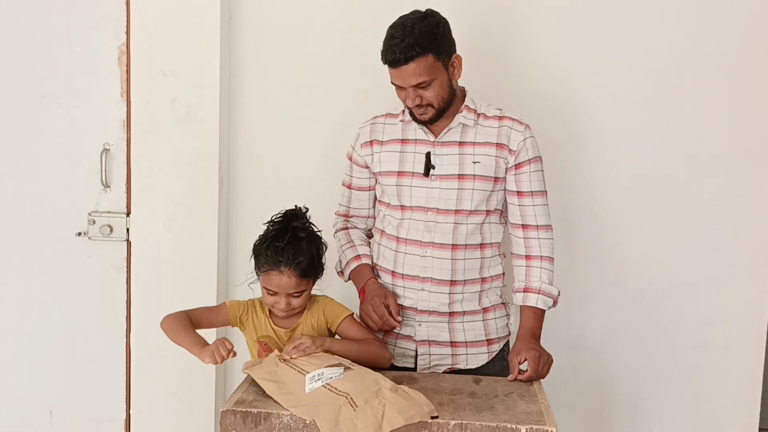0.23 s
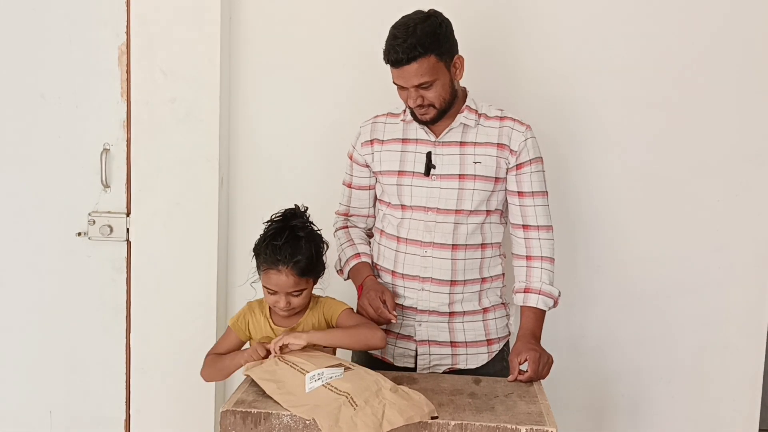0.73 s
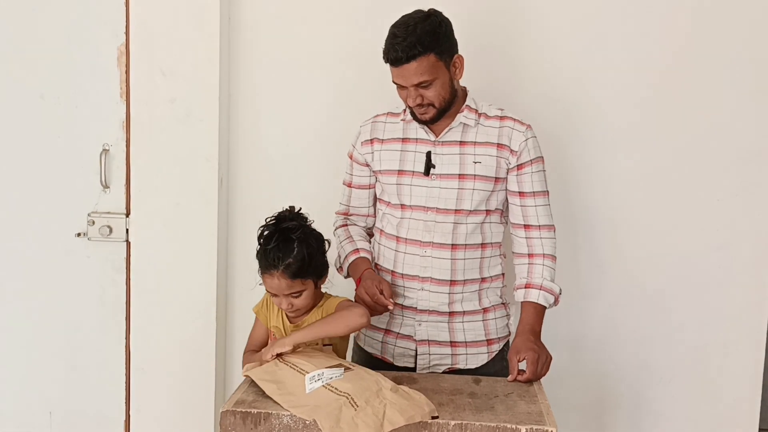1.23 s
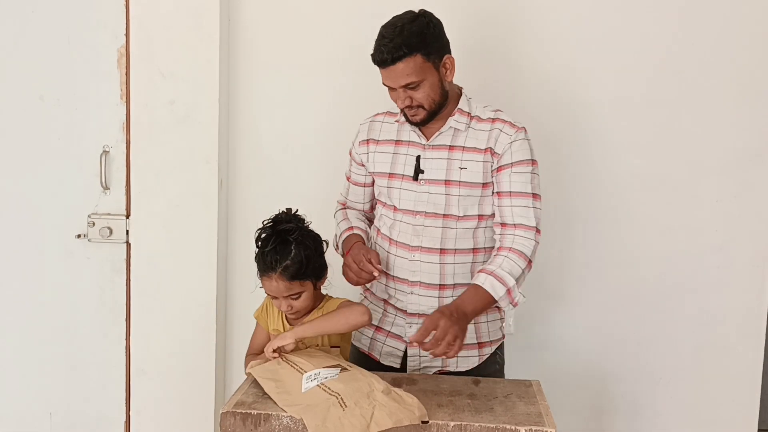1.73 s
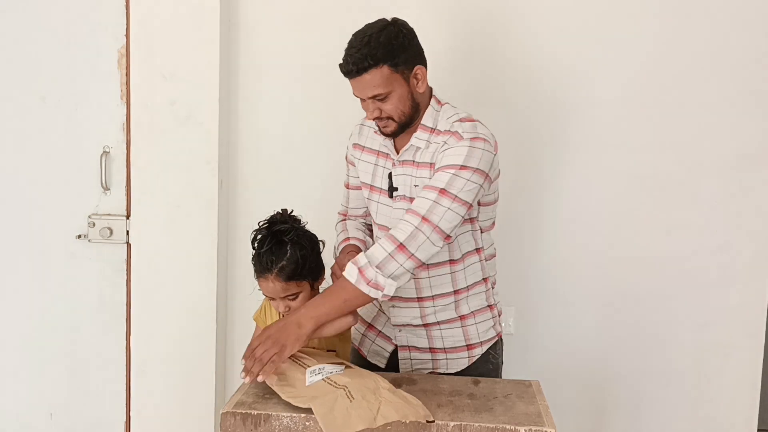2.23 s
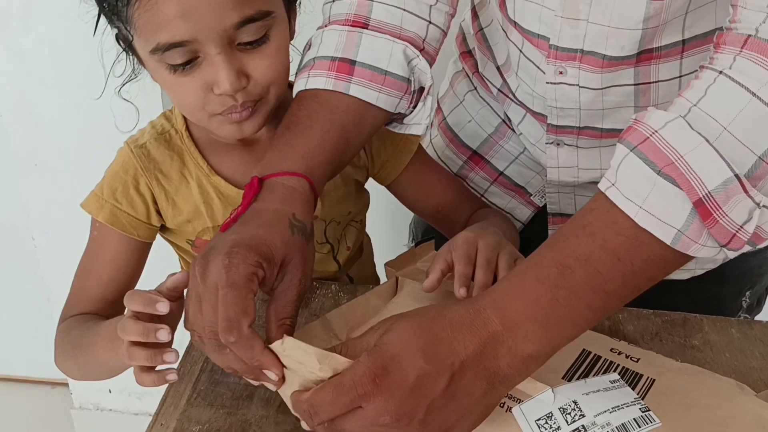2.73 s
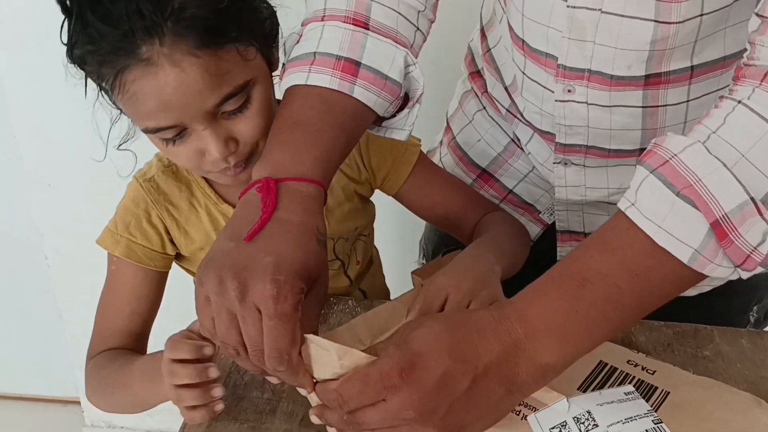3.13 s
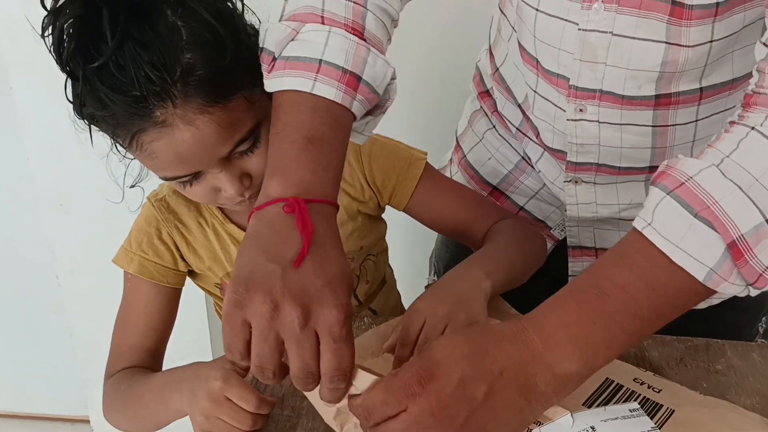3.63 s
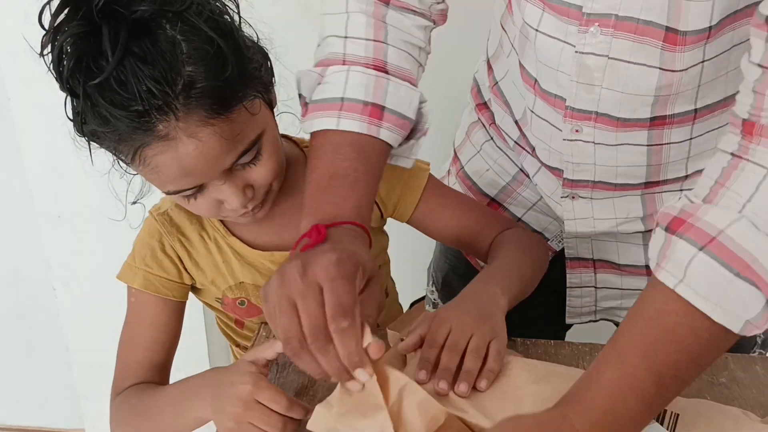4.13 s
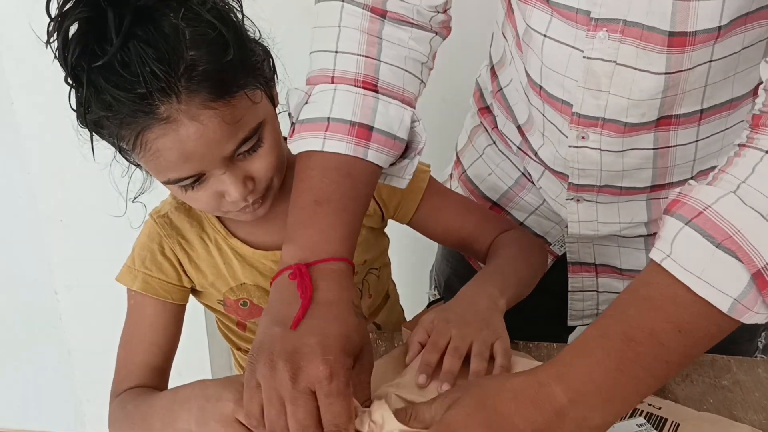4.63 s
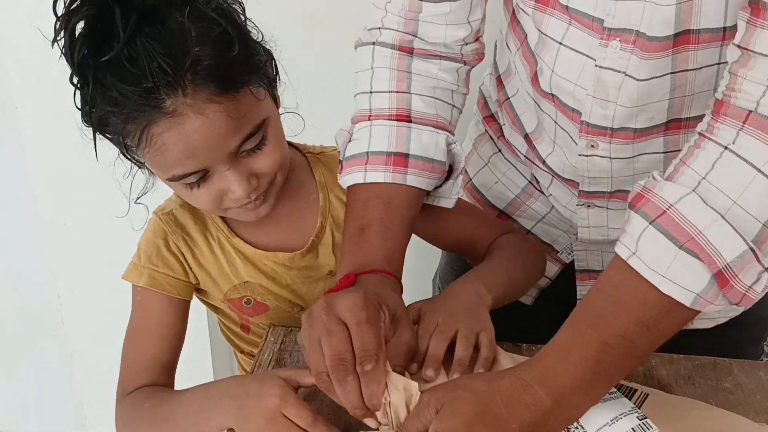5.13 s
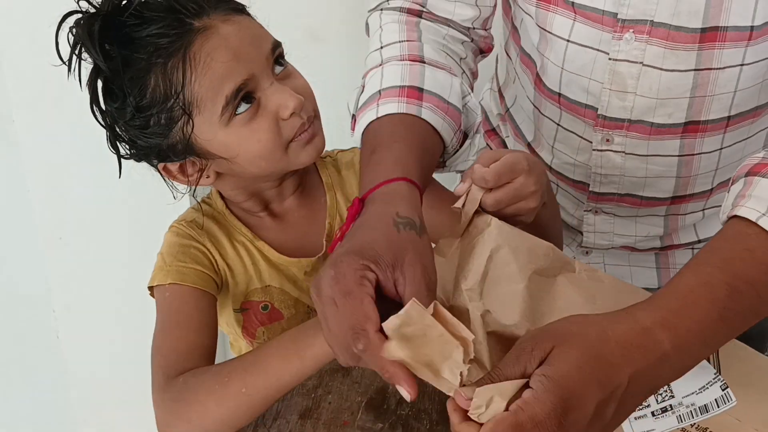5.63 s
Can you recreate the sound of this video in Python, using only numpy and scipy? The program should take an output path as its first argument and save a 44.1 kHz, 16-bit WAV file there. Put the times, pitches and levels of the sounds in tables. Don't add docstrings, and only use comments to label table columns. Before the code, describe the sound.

A stiff paper mailer is opened by hand at a wooden table in a small, lightly echoing room, heard through a close lapel microphone over very faint hush. From 0 to 0.45 s, fingers make scattered crisp crackles and hollow pops; then it is nearly quiet, with tiny ticks around 1.1 s. Sharper creases come at 1.4-1.75 s. Around 2.0-2.3 s a palm slides softly over paper while cloth shudders low against the microphone, ending in a sharp snap near 2.3 s and another just before the 2.6 s cut. A faint knuckle tap follows at 2.7 s. Snaps thicken at 2.85-3.2 s, ease, then return at 3.55 s. From 3.9 to 5.2 s tearing and crumpling are dense and loud, strongest near 4.2 s and around 4.8-5.1 s. At 5.24 s it abruptly drops to sparse faint folds, then snappy creases and a cloth bump at 5.75-5.9 s.

```python
import sys
import numpy as np
from scipy import signal
from scipy.fft import rfft, irfft
from scipy.io import wavfile
from scipy.ndimage import uniform_filter1d, minimum_filter1d

SR = 44100
rng = np.random.default_rng(int(sys.argv[2]) if len(sys.argv) > 2 else 0)


def natural_amplitude(level_db):
    exponent = np.asarray(level_db, float) / 20
    return 10 ** exponent


def file_out(sig):
    cols = np.atleast_2d(sig).T
    lim = np.clip(cols, -1, 1)
    pcm = np.round(lim * 32767).astype(np.int16)
    wavfile.write(sys.argv[1], SR, pcm)


N = 259749

# (frequency [Hz], level per hertz [dB])
BUCKLE_SPECTRUM = [(120, -51), (200, -33.5), (297, -7.5), (489, -15.5), (588, 0), (1390, -3), (3200, -10.5),
                   (4160, -43), (7040, -120)]
FIBRE_SPECTRUM = [(1530, -4), (2600, -6), (2820, -5.5), (4200, -6), (6390, -8.5), (7540, -11), (8310, -14),
                  (9950, -20.5), (11700, -29.5), (15600, -53.5)]
RUMBLE_SPECTRUM = [(22, -4.5), (40, -1.5), (54, -4), (70, -12.5), (110, -15), (200, -21.5)]
# (frequency [Hz], level per hertz [dB])
HUSH_SPECTRUM = [(90, -10.5), (200, -11), (790, -18.5), (4000, -28.5), (10000, -34.5), (12500, -56)]
# (frequency [Hz], width [Hz], level [dB])
SLIDE_BANDS = [(727, 470, 0.5), (1170, 120, 1.5), (1830, 224, 12.5), (2343, 130, 9), (3300, 790, -9),
               (4600, 480, -7.5), (6750, 540, -14), (9330, 2400, -19.5)]

# (frequency [Hz], level [dB], 60 dB decay time [s])
TABLE_MODES = [(98.4, -7.5, 0.14), (283.4, -1.5, 0.2), (301.6, -0.5, 0.09), (408, 7.5, 0.026),
               (542.3, -2.5, 0.22), (569, -0.5, 0.16)]
# (time [s], level [dB])
KNOCKS = [
    (2.6854, -18.5),
    (2.716, -19.5),
]

# (frequency [Hz], 60 dB decay time [s])
ROOM_DECAY = [(200, 0.62), (530, 0.44), (1400, 0.3), (3700, 0.38), (9700, 0.14)]
# (start [s], end [s])
SHOTS = [
    (0, 2.5872),
    (2.601, 5.2405),
    (5.243, 6),
]
# (frequency [Hz], width [Hz], gain [dB])
SHADES = [
    [(444, 160, 6), (5680, 1000, -3.5), (9060, 640, 4.5)],
    [(990, 310, -2), (2893, 550, -5), (8200, 600, -5)],
    [(1240, 870, -6.5), (1780, 330, 2), (2840, 1500, -7), (9670, 7200, -8.5)],
]
ROOM_DB = [1.5, -1.5, -2.5]
# (start [s], end [s], frequency [Hz], width [Hz], gain [dB])
COVERS = [(0.41, 0.55, 3000, 700, 6.5), (1.06, 1.42, 1030, 330, -10.5), (1.2, 1.43, 4800, 1300, -9),
          (1.17, 1.35, 2500, 2600, 4.5), (2, 2.1, 5400, 900, -10), (2.57, 2.96, 2630, 860, -7.5),
          (3.39, 3.57, 2880, 570, -20), (3.67, 3.86, 10000, 5000, -22), (1.6, 1.6, 350, 260, 5),
          (3.9, 4.1, 410, 210, 9.5), (2.77, 2.87, 6000, 1800, 5.5), (5.16, 5.25, 7400, 4000, -5),
          (4.44, 4.64, 800, 600, -6.5), (5.25, 5.5, 6200, 4300, 3)]
# (start [s], end [s])
DULL_SPELLS = [(3.575, 3.632), (3.7, 3.9), (4.06, 4.125), (4.345, 4.398), (4.64, 4.776), (5.135, 5.24),
               (5.76, 5.9)]

# (peak time [s], swell [ms], fade [ms], crackle level [dB], fizz above crackle [dB])
FINGERS = [(0.0, 11, 102, -37.5, 1.5), (0.14, 7.8, 89, -52.5, 16), (0.224, 5.1, 181, -18.5, 0),
           (0.6, 110, 320, -59.5, 1.5), (0.68, 4.9, 82, -42, -0.5), (1.025, 3.4, 360, -71.5, 14),
           (1.1, 24, 310, -45, -3), (1.25, 240, 230, -58.5, -21), (1.468, 110, 170, -36, -5),
           (1.548, 45, 162, -26, 3), (2.293, 2.8, 174, -21.5, -15), (2.5, 470, 330, -53, -10)]
# (peak time [s], swell [ms], fade [ms], crackle level [dB], fizz above crackle [dB])
HANDS = [(2.66, 210, 430, -47, 9.5), (2.781, 47, 520, -52.5, 15.5), (2.979, 10, 213, -30, 1),
         (3.12, 290, 110, -27, 2.5), (3.412, 10, 2100, -52.5, 11.5), (3.616, 164, 29, -28, 0),
         (3.901, 18, 1060, -24.5, -6.5), (4.09, 200, 120, -26, -5.5), (4.135, 4.5, 116, -10.5, 1),
         (4.19, 46, 90, -13, 1), (4.321, 180, 390, -23, -4.5), (4.401, 22, 25, -18.5, 8),
         (4.53, 30, 100, -34.5, 8), (4.664, 70, 1600, -29.5, -1), (4.891, 10, 840, -23.5, -3),
         (5.1, 800, 2300, -27, -31), (5.369, 770, 280, -50.5, -8), (5.564, 140, 67, -44, -7.5),
         (5.661, 260, 420, -55, -1), (5.78, 92, 3300, -29, -26)]
# (peak time [s], swell [ms], fade [ms], level [dB])
BRUSHES = [(0.33, 1900, 460, -47.5), (1.76, 1100, 570, -48), (2.05, 45, 460, -35.5), (2.18, 47, 110, -35),
           (2.74, 730, 380, -43), (3.22, 500, 620, -45.5), (4.2, 260, 1400, -44), (5.2, 1300, 640, -46),
           (5.89, 91, 100, -31)]
# (peak time [s], swell [ms], fade [ms], level [dB])
SLEEVE = [
    (5.246, 2, 310, -54.5),
]
# (peak time [s], swell [ms], fade [ms], level [dB])
SLIDES = [(2.04, 69, 230, -32), (2.095, 104, 56, -30.5), (2.165, 36, 180, -35), (2.215, 120, 120, -32)]
# (peak time [s], swell [ms], fade [ms], level [dB], pitch [Hz])
HUMS = [(0.06, 900, 350, -45.5, 892), (0.63, 150, 170, -59.5, 2650), (2.68, 140, 160, -36.5, 1834),
        (2.8, 260, 300, -44, 1587), (0.7, 28, 130, -52.5, 1474), (3.571, 260, 51, -37, 583),
        (3.849, 60, 82, -39.5, 2490), (5.386, 63, 82, -48, 1946), (5.57, 120, 70, -49, 776),
        (5.569, 70, 73, -48, 1467), (5.79, 72, 580, -34.5, 1820)]

# (peak time [s], panel level [dB], panel pitch [Hz], crack above panel [dB], crack pitch [Hz])
PICKS = [(0.0575, -29.5, 2200, 10, 3820), (0.0672, -35, 970, 10, 3900), (0.1382, -25, 1950, -10, 3100),
         (0.1426, -22, 1690, -2, 3570), (0.1509, -32, 2690, 5, 4320), (0.2277, -11, 1900, -3, 3150),
         (0.2324, -34, 1600, -19, 4630), (0.2699, -19, 1390, 2, 6200), (0.3124, -7.5, 802, -8, 3650),
         (0.376, -21, 940, -4, 7050), (0.4247, -35.5, 630, 16.5, 7300), (0.5625, -44.5, 1250, 0.5, 6880),
         (0.6817, -45.5, 2050, -6, 4890), (0.7102, -35, 2065, -5.5, 3700), (1.0223, -49, 2590, 14.5, 5300),
         (1.0724, -42, 2260, 5, 3410), (1.0992, -36, 2050, 9.5, 5530), (1.1369, -33.5, 680, 5, 3640),
         (1.2264, -29.5, 2460, -3, 3760)]
PULLS = [(1.3049, -40.5, 2255, 3, 6300), (1.372, -50, 2520, 4.5, 6500), (1.3965, -35.5, 2330, 0.5, 7200),
         (1.4212, -26.5, 1450, -3.5, 3430), (1.4683, -18.5, 2430, -5, 3980), (1.5184, -23.5, 2100, 3, 3500),
         (1.541, -17.5, 1980, -6, 3233), (1.549, -20.5, 1305, 6.5, 3300), (1.5663, -14, 2170, -5, 3680),
         (1.6462, -17, 1480, 8.5, 7020), (1.7246, -27, 2170, 2.5, 3420), (2.2858, -32.5, 555, 2.5, 4430),
         (2.2957, -8.5, 950, 2, 4700), (2.3001, -10.5, 1196, 2, 4900), (2.4014, -20.5, 1220, -12, 4300),
         (2.5727, -3.5, 1493, -8.5, 6830), (2.579, -34, 1940, 7, 4480), (2.5841, -8, 1640, -6.5, 4600)]
PRIES = [(2.6455, -23.5, 1780, 2, 4550), (2.772, -31, 683, 8.5, 4500), (2.8356, -15.5, 1650, -1, 4600),
         (2.8639, -22.5, 1560, 1, 4330), (2.8769, -23, 1400, 10.5, 4830), (2.8844, -6, 1570, 0, 5070),
         (2.9243, -10.5, 1540, -12, 4830), (2.9416, -14.5, 1120, -7, 4830), (2.959, -19.5, 1510, 0, 5070),
         (2.9839, -7.5, 1730, 1, 4700), (2.9883, -9, 1420, -7, 6100), (3.0182, -27, 630.5, 11.5, 3960),
         (3.0413, -23.5, 1540, 8, 4200), (3.0591, -18, 1140, 12, 5100), (3.0717, -9, 1210, -23, 4440),
         (3.0823, -2.5, 1160, -14, 4400), (3.0998, -7, 1510, -4, 5060), (3.114, -18.5, 1290, 11.5, 5550),
         (3.128, -14.5, 1500, 2.5, 3640), (3.1441, -2, 1570, -11, 4120), (3.1569, -6, 1980, -12, 3200),
         (3.161, -3, 2010, -7, 4170), (3.2165, -16.5, 1100, -16, 4680), (3.221, -24.5, 1200, 7, 4600)]
LIFTS = [(3.3998, -41, 1140, 9, 4100), (3.4094, -40.5, 2270, 19, 3900), (3.5148, -23.5, 1650, 6, 4240),
         (3.5629, -29.5, 553, 16.5, 4400), (3.5684, -25, 600, 10.5, 4600), (3.5736, -16.5, 1430, -14, 3650),
         (3.579, -23.5, 1230, 8.5, 4070), (3.5907, -20.5, 1390, 6, 4490), (3.595, -14, 1380, -3, 4200),
         (3.62, -10, 1160, -14, 4030), (3.6361, -9, 1660, -8, 4440), (3.6404, -12, 2180, 7.5, 3940),
         (3.6438, -12.5, 1050, 1, 3970), (3.702, -25.5, 2410, 16.5, 4350), (3.7348, -27, 1570, -3.5, 3870),
         (3.7912, -33.5, 1430, -4, 3960), (3.8087, -28, 2420, 6.5, 4300), (3.814, -28.5, 1570, -1, 4070),
         (3.8407, -23.5, 2480, 9, 4450), (3.8505, -23.5, 2420, 4.5, 4340)]
TEAR = [(3.887, -27.5, 2380, 21, 6350), (3.9022, -17.5, 2300, 15.5, 4900), (3.908, -7, 1420, 4, 4320),
        (3.9385, -6.5, 1680, -6, 4000), (3.9648, -9, 1660, -4, 4290), (3.9976, -2.5, 2220, -0.5, 4500),
        (4.0092, -0.5, 1600, -10, 4600), (4.019, -2, 1510, -11.5, 4200), (4.0247, -11, 1420, 0.5, 6001),
        (4.0756, -11.5, 1230, -5.5, 4800), (4.1111, -5.5, 1260, 0.5, 4730), (4.1361, -6, 1350, -5, 3900),
        (4.1588, -3.5, 1340, -11.5, 4100), (4.1828, 3.5, 1750, -10.5, 3720), (4.1882, 2.5, 1400, 2.5, 4310),
        (4.1967, -13.5, 1860, -6.5, 4100), (4.213, -7, 1670, 4.5, 6400), (4.228, -9.5, 1300, -17.5, 4530),
        (4.243, -16.5, 1670, -2.5, 3049), (4.2744, -18, 1770, 4.5, 3320), (4.2907, -18, 1300, 6.5, 3300)]
BUNCH = [(4.312, -17, 840, -9, 4160), (4.3175, -11, 1650, -6, 3450), (4.344, -11, 1640, -17, 3650),
         (4.3988, -15, 1400, -3.5, 4170), (4.4064, -6, 1170, 5.5, 4750), (4.439, -10, 2020, -5, 3900),
         (4.5165, -15.5, 2140, -3, 3000), (4.5315, -18, 1170, 3.5, 3240), (4.5384, -17, 2280, -7.5, 3430),
         (4.548, -18, 1760, 3.5, 4220), (4.5597, -31, 2074, -7, 3750), (4.6467, -17, 1640, 0, 4800),
         (4.6556, -13.5, 1670, -1.5, 4700), (4.6804, -11.5, 1650, -6, 3830),
         (4.6907, -11.5, 1720, 3.5, 5160), (4.736, -14.5, 1480, -2, 5120), (4.739, -16, 1410, 5, 6440),
         (4.747, -19, 1110, 14.5, 6670), (4.7579, -6, 1830, 2, 7340), (4.763, -9.5, 1530, -5, 6750),
         (4.767, -2.5, 1060, -9, 4900), (4.774, -7.5, 915, -13, 3930), (4.7786, -7.5, 1390, -0.5, 4900)]
CRUMPLE = [(4.798, -13, 1700, 6, 4100), (4.8009, -4, 1830, -14, 5150), (4.8053, -1, 1600, -21, 3930),
           (4.8126, -7.5, 1740, -20, 4470), (4.8359, -16, 1640, 2.5, 3670), (4.8646, -16, 1620, 8, 3430),
           (4.891, -2, 1720, -12, 3550), (4.9158, -12.5, 1080, 2, 3820), (4.9435, -10.5, 2550, 1.5, 3450),
           (4.9634, -12.5, 1420, 4.5, 3460), (5.0, -8.5, 610, 1.5, 4220), (5.0062, -2.5, 1700, -4.5, 3350),
           (5.0342, -1, 1720, -25, 4950), (5.04, -7.5, 640, 1, 4910), (5.0816, 0, 1640, -8, 3830),
           (5.086, -1, 1380, -9.5, 4150), (5.0905, -5, 848, -16, 4000), (5.102, -13, 1330, 1.5, 3040),
           (5.107, -10.5, 615, -32, 4400), (5.1214, -6.5, 1350, -2.5, 4330),
           (5.1314, -6.5, 1900, -17, 3080), (5.1567, -13, 1800, -3.5, 4290), (5.1675, -17.5, 1000, 3, 3200),
           (5.2022, -10.5, 2050, -12, 3510)]
FOLDS = [(5.303, -39, 1374, -10, 7700), (5.3532, -31.5, 1910, -13, 3460), (5.3727, -25, 1900, -22.5, 3110),
         (5.443, -36, 1830, -10, 3200), (5.5312, -37, 730, 2, 3270), (5.6423, -40, 1600, -8, 3970),
         (5.6777, -49, 910, 1, 3630), (5.7135, -30, 1720, -10.5, 4200), (5.7487, -23.5, 1730, -30, 3120),
         (5.7679, -21.5, 850, -3.5, 4500), (5.7795, -11, 786, -9, 4570), (5.8199, -8.5, 2180, -15, 4700),
         (5.8311, -3.5, 892, -16.5, 3640), (5.8399, -7.5, 1105, -21, 4750), (5.8497, -11.5, 910, -7, 4700),
         (5.872, -12, 907, -11, 4590), (5.8822, -7, 2310, -17, 3100)]
LATE_CREASES = [(4.9533, -22, 2190, 6.5, 5150), (4.984, -16, 1780, 3, 7770), (5.5481, -30, 1440, -15, 3300)]


def evened(x):
    return x / np.sqrt(np.mean(x ** 2) + 1e-20)


def read(points, hz):
    f, value = np.transpose(points)
    return np.interp(np.log(hz + 1), np.log(f + 1), value, value[0] - 40, value[-1] - 40)


def curve(rows):
    s, *columns = np.transpose(rows)
    return [np.interp(np.arange(N) / SR, s, c) for c in columns]


def coloured(x, points):
    log_gain = np.log(natural_amplitude(read(points, np.abs(np.fft.fftfreq(4096, 1 / SR)))))
    response = np.exp(np.conj(signal.hilbert(log_gain)))
    taps = np.fft.ifft(response).real[:2048]
    return signal.oaconvolve(x, taps / np.linalg.norm(taps))[:len(x)]


def add(mix, s, sound):
    part = mix[round(s * SR):][:len(sound)]
    part += sound[:len(part)]


def ring(hz, cycles, size=900):
    turns = np.arange(size) / SR * hz
    envelope = (1 - np.exp(-turns / 0.5)) ** 2 * np.exp(-turns / cycles)
    return envelope / envelope.max() * np.sin(2 * np.pi * turns)


def clicks(per_s, spread_db, clump):
    size = natural_amplitude(spread_db * np.minimum(rng.exponential(1, N), 4)) * rng.choice([-1., 1.], N)
    return size * (rng.random(N) < per_s * clump / SR)


def effort(moves, rest_db=-120, column=False):
    t = np.arange(0, N / SR + .001, .0005)
    power = natural_amplitude(rest_db) ** 2
    for s, swell_ms, fade_ms, db, *above in moves:
        start, end = next(piece for piece in SHOTS if s < piece[1])
        rise = np.maximum(s - t, 0) * 1000 / swell_ms
        fall = np.maximum(t - s, 0) * 1000 / fade_ms
        drop_db = 30 * (rise ** 0.68 + fall ** 0.88)
        inside = (t >= start) * (t < end)
        power = power + inside * natural_amplitude(db + column * sum(above) - drop_db) ** 2
    return np.interp(np.arange(N) / SR, t, np.sqrt(power))


def creases():
    return np.transpose(sorted(PICKS + PULLS + PRIES + LIFTS + TEAR + BUNCH + CRUMPLE + FOLDS + LATE_CREASES))


def shower(db, before_s, after_s):
    marks = np.zeros(N)
    marks[np.round(creases()[0] * SR).astype(int)] = natural_amplitude(db) ** 2
    t = np.arange(-3000, 3001) / SR
    spread = np.exp(np.minimum(t / before_s, -t / after_s))
    return np.sqrt(np.abs(signal.oaconvolve(marks, spread, "same")))


def patchy(x, patchy_db):
    z = signal.stft(x, nperseg=256)[2]
    patches = uniform_filter1d(rng.standard_normal(z.shape), 5, 0)
    patches = uniform_filter1d(patches, 14, 1)
    return signal.istft(z * natural_amplitude(patchy_db * evened(patches)), nperseg=256)[1][:N]


def background():
    reaching = curve([(1.98, 0), (2.03, 1), (2.27, 1), (2.3, 0)])[0]
    shudder_hz = 54.0 * (1 + 0.07 * evened(uniform_filter1d(rng.standard_normal(N), 2500)))
    shudder = np.sqrt(2) * np.sin(2 * np.pi * np.cumsum(shudder_hz) / SR)
    lumps = coloured(rng.standard_normal(N), RUMBLE_SPECTRUM)
    moving = effort(BRUSHES, rest_db=-64)
    rumble = moving * (lumps * (1 - 0.52 * reaching) + 2.4 * reaching * shudder)
    hiss = coloured(rng.standard_normal(N), [(7500, -10.5), (9500, 4.0), (11500, -22.0)])
    hush = natural_amplitude(-71.5) * coloured(rng.standard_normal(N), HUSH_SPECTRUM)
    return rumble + effort(SLEEVE) * hiss + hush


def crackle():
    rest_db = -94
    creasing = effort(FINGERS + HANDS, rest_db)
    tearing = effort(FINGERS + HANDS, rest_db, column=True)
    s, snap_db, snap_hz, above_db, _ = creases()
    panel_hz = curve(np.transpose([s, snap_hz]))[0]

    clump = natural_amplitude(3.8 * evened(uniform_filter1d(rng.standard_normal(N), 500)))
    clump /= clump.mean()

    pitches = np.geomspace(200, 3000, 17)
    weights = []
    for hz in pitches:
        closeness = .5 + np.exp(-(np.log(hz / panel_hz) / 0.11) ** 2)
        weights.append(natural_amplitude(read(BUCKLE_SPECTRUM, hz) + 10 * np.log10(hz)) * closeness)
    weights = np.array(weights)
    weights /= np.sqrt((weights ** 2).sum(0))
    buckles = np.zeros(N)
    for hz, weight in zip(pitches, weights):
        train = evened(clicks(190, 3.6, clump))
        tone = ring(hz, cycles=4)
        buckles += signal.oaconvolve(weight * train, tone / np.linalg.norm(tone))[:N]

    bursts = uniform_filter1d(np.abs(clicks(4500, 3.0, clump)), size=21) * rng.standard_normal(N)
    fizz = evened(patchy(coloured(bursts, FIBRE_SPECTRUM), patchy_db=3.5))
    buckle_level = np.hypot(creasing * natural_amplitude(2.23), shower(snap_db - 16.5, 0.001, 0.0028))
    fizz_level = np.hypot(tearing * natural_amplitude(-0.2), shower(snap_db + above_db - 13.5, 0.0012, 0.0018))
    return buckles * buckle_level + fizz * fizz_level


def hums():
    out = np.zeros(N)
    width_hz = 62
    r = np.exp(-np.pi * width_hz / SR)
    for *move, hz in HUMS:
        rub = clicks(1500, 2.5, 1)
        poles = [1, -2 * r * np.cos(2 * np.pi * hz / SR), r * r]
        out += effort([move]) * evened(signal.lfilter([1, 0, -1], poles, rub))
    return out


def snaps():
    body, grits = np.zeros(N), np.zeros(N)
    rows = creases().T
    draws = rng.random((len(rows), 3))
    t = np.arange(300) / (0.0008 * SR)
    grit = rng.standard_normal((len(rows), 300)) * t * np.exp(-t)
    for (s, db, hz, above_db, crack_hz), (a, b, c), g in zip(rows, draws, grit):
        crack_db = db + above_db
        add(body, s - 1.284 / hz, natural_amplitude(db - 2.0) * ring(hz, cycles=2.16))
        add(body, s + 0.00388 * (a - .4), natural_amplitude(db - 14.5) * ring(hz * (0.75 + 0.9 * b), cycles=1.3))
        add(body, s - .0012, natural_amplitude(db - 27.0) * ring(290 + 180 * c, cycles=0.29, size=2000))
        add(body, s - 1.25 / crack_hz, natural_amplitude(crack_db - 7.0) * ring(crack_hz, cycles=6.6))
        g = np.convolve(g, ring(crack_hz, cycles=0.97, size=80))
        add(grits, s - .0014, natural_amplitude(crack_db + 3.5) * g / np.linalg.norm(g))
    return body + coloured(grits, FIBRE_SPECTRUM)


def room_tail():
    taps = np.zeros(SR)
    at = np.arange(160, SR - 20, 20)
    taps[at + rng.integers(0, 20, len(at))] = rng.choice([-1., 1.], len(at))
    hz, t, z = signal.stft(taps, SR, nperseg=256)
    decay_hz, decay_s = np.transpose(ROOM_DECAY)
    t60 = np.interp(np.log(hz + 1), np.log(decay_hz), decay_s)
    tail = signal.istft(z * natural_amplitude(-60 * t / t60[:, None]), SR, nperseg=256)[1]
    return tail / np.linalg.norm(tail)


def shaded(x, bells):
    hz = np.fft.rfftfreq(N, 1 / SR)
    gain_db = sum(db * np.exp(-(2 * (hz - f) / width) ** 2) for f, width, db in bells)
    return irfft(rfft(x) * natural_amplitude(gain_db), N)


def covered(x):
    hz, t, z = signal.stft(x, SR, nperseg=512)
    db = np.zeros(z.shape)
    for start, end, band_hz, width, gain_db in COVERS:
        bell = np.exp(-(2 * (hz - band_hz) / width) ** 2)
        presence = np.clip(np.minimum(t - start, end - t) / 0.024 + .5, 0, 1)
        db += gain_db * np.outer(bell, presence)
    return signal.istft(z * natural_amplitude(db), SR, nperseg=512)[1][:N]


def slide():
    noise, hz = rfft(rng.standard_normal(N)), np.fft.rfftfreq(N, 1 / SR)
    bands = sum(natural_amplitude(db) / (1 + (2 * (hz - f) / width) ** 2) ** 1.07 for f, width, db in SLIDE_BANDS)
    bands += natural_amplitude(-12) * hz / (hz + 600) / (1 + (hz / 6000) ** 6)
    return effort(SLIDES) * evened(patchy(irfft(noise * bands, N), patchy_db=2.5))


def table():
    out, t = np.zeros(N), np.arange(SR // 2) / SR
    modes = sum(natural_amplitude(db - 60 * t / t60) * np.sin(2 * np.pi * hz * t) for hz, db, t60 in TABLE_MODES)
    soft_contact = 1 - np.exp(-t / 0.0019)
    for s, db in KNOCKS:
        add(out, s, natural_amplitude(db) * modes * soft_contact)
    return out


def scene():
    t = np.arange(N) / SR
    far = background()
    soft = crackle() + hums() + table()
    sharp = snaps()
    rub = slide()
    sent = natural_amplitude(-7.5) * soft + natural_amplitude(-9.0) * sharp

    tails = [room_tail() for _ in range(3)]
    sway = 2 * np.pi * t * 7.0
    out = np.zeros(N)
    for (start, end), bells, room_db in zip(SHOTS, SHADES, ROOM_DB):
        inside = (t >= start) * (t < end)
        wet = np.zeros(N)
        for k, tail in enumerate(tails):
            share = np.sqrt(2 / 3) * np.cos(sway + k * np.pi / 3)
            wet += signal.fftconvolve(inside * sent * share, tail)[:N]
        fade = np.clip(np.minimum(t - start + (start == 0), end - t) / .0006, 0, 1)
        near = shaded(soft + sharp + rub + natural_amplitude(room_db) * wet, bells)
        out += fade * (covered(near) + far)
    return out[None]


def roll_off(x):
    return signal.sosfilt(signal.butter(12, 15760, fs=SR, output="sos"), x)


def record(dry):
    peak = -minimum_filter1d(-np.abs(dry), size=61, axis=1)
    held = dry * uniform_filter1d(1 / np.maximum(peak, 1), size=61, axis=1)
    limited = signal.oaconvolve(held, signal.firwin(255, 15600, fs=SR)[None], "same")
    low_pass = signal.firwin(255, 12200, window=("kaiser", 7), fs=SR)
    dull = signal.oaconvolve(limited, low_pass[None], "same")
    t = np.arange(N) / SR
    kept = 1 - sum((start < t) * (t < end) for start, end in DULL_SPELLS)
    mix = dull + (limited - dull) * uniform_filter1d(kept * 1., size=201)
    return roll_off(mix)


dry = scene()
out = record(dry)
file_out(out)
```